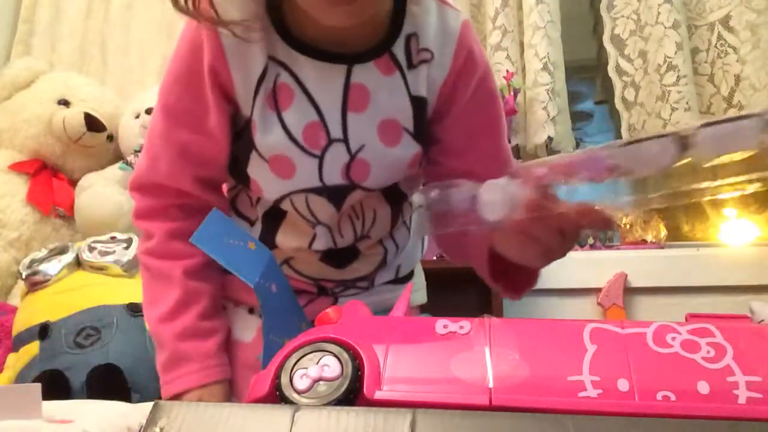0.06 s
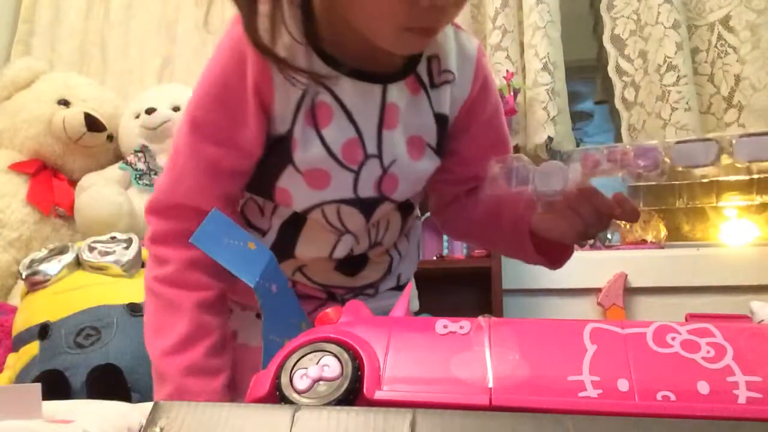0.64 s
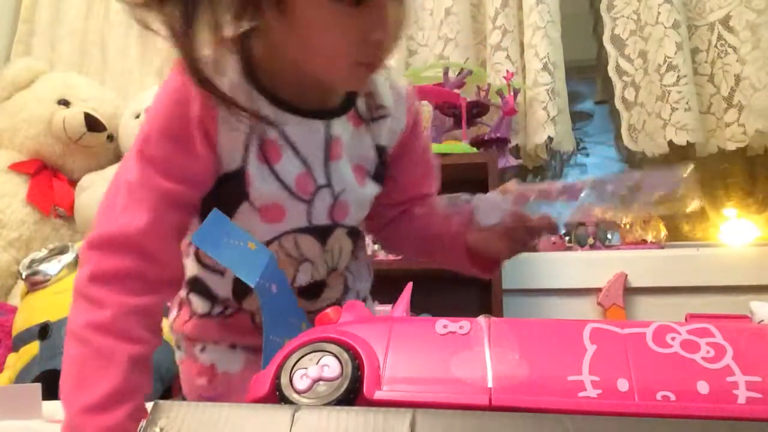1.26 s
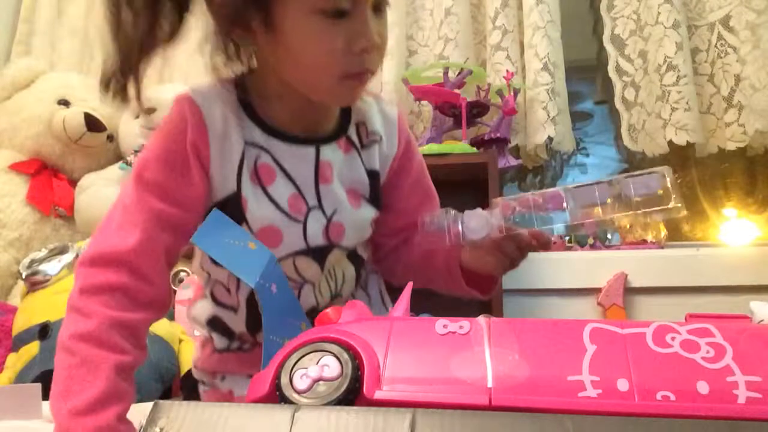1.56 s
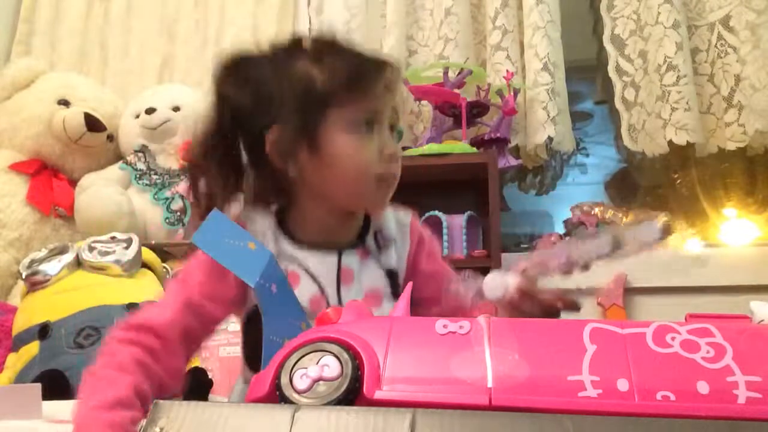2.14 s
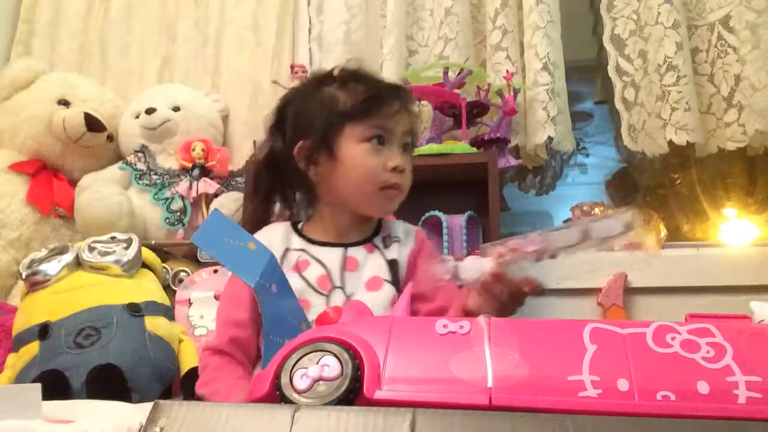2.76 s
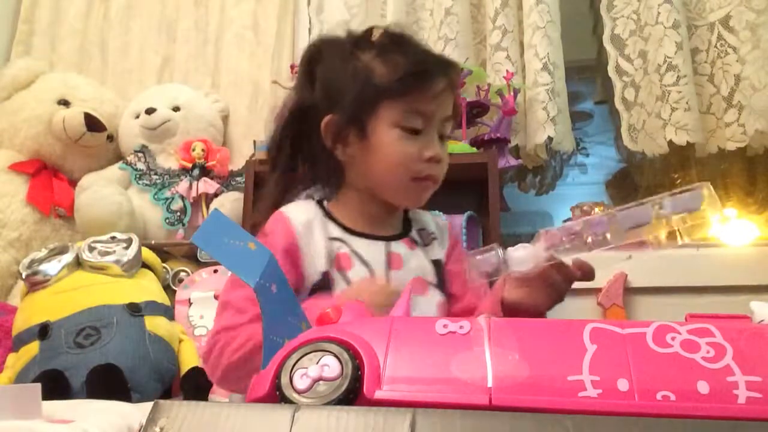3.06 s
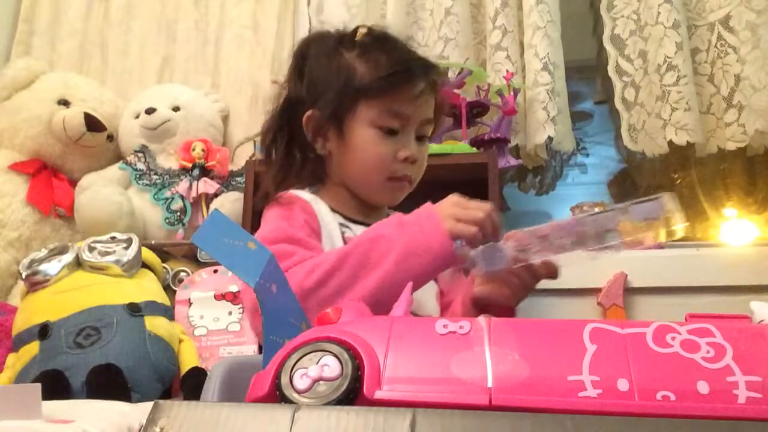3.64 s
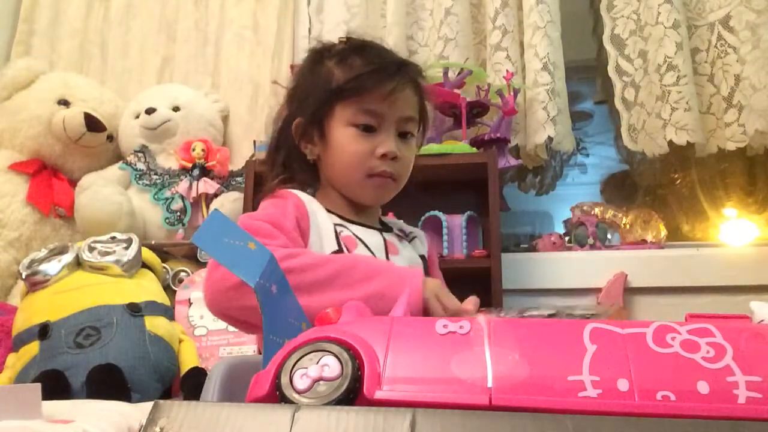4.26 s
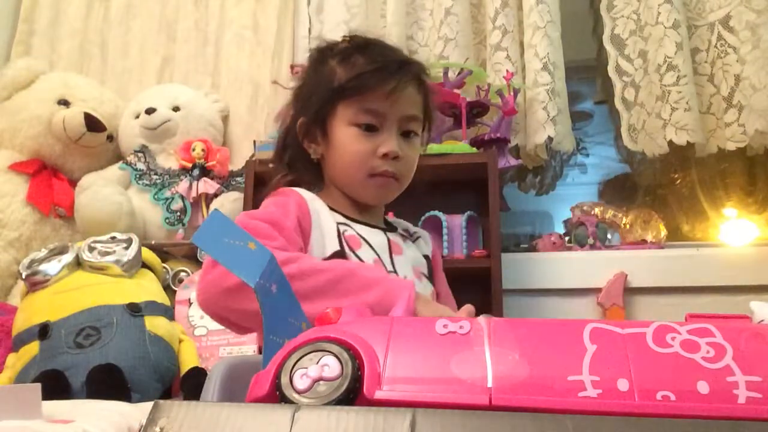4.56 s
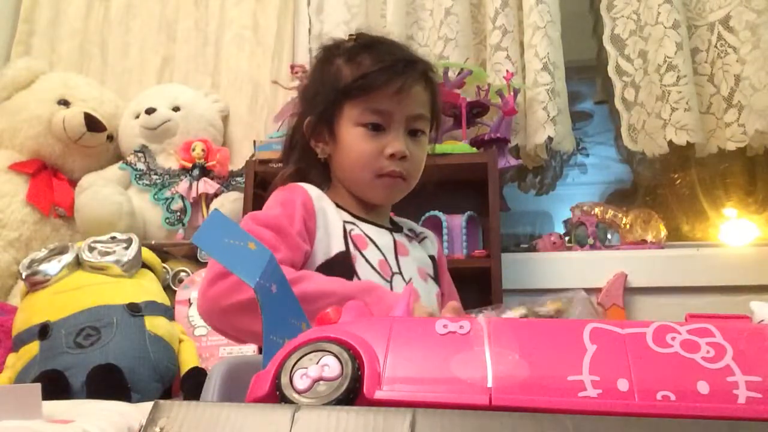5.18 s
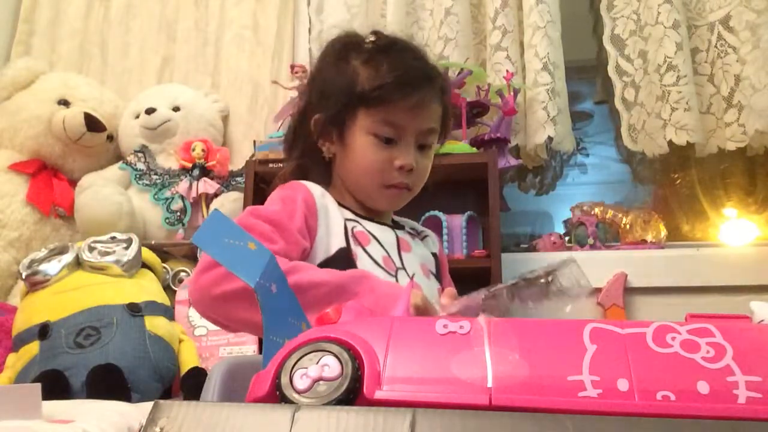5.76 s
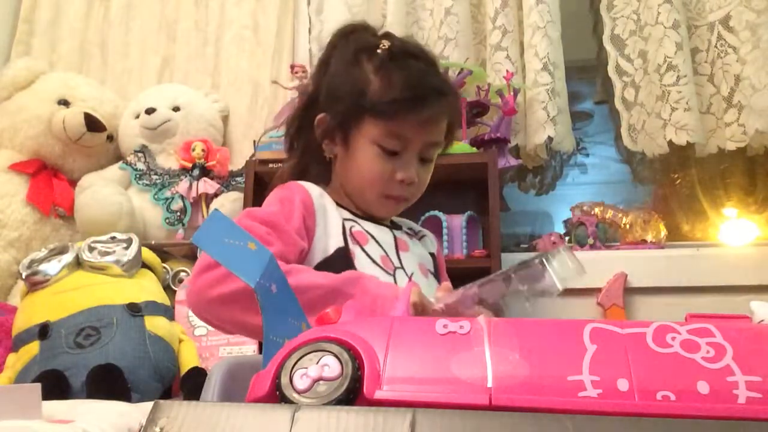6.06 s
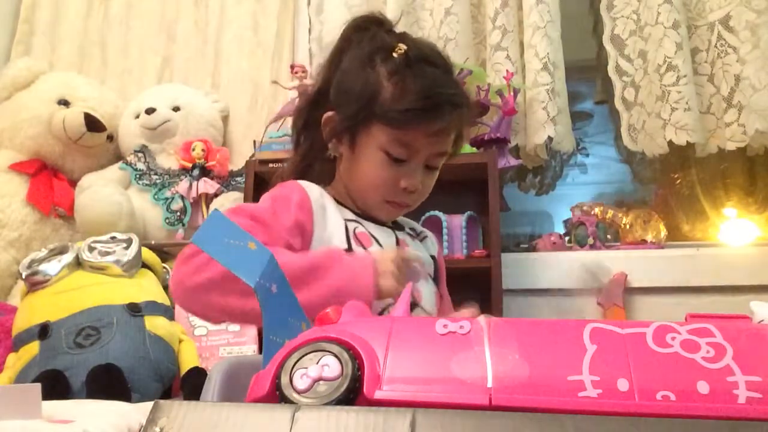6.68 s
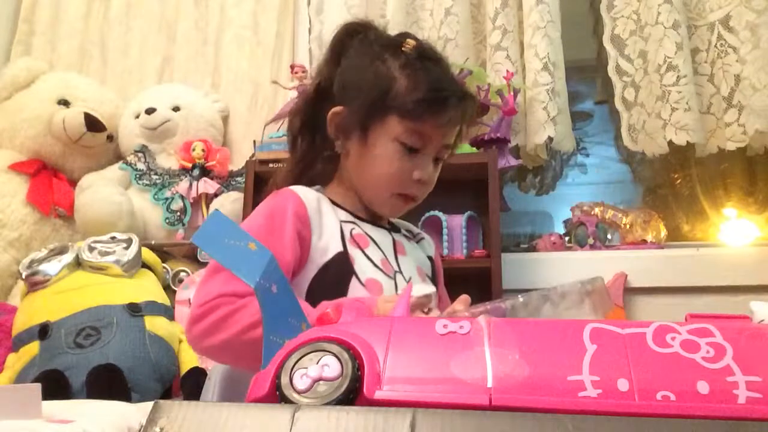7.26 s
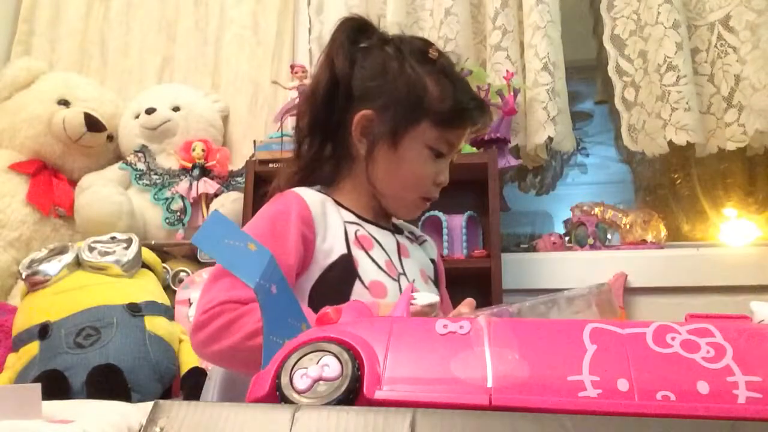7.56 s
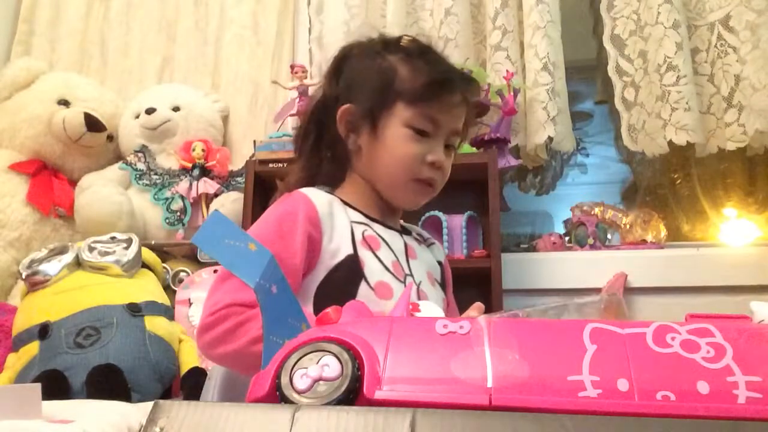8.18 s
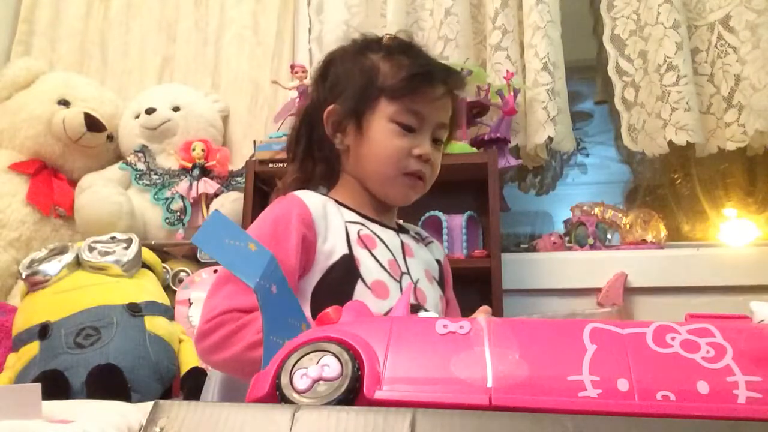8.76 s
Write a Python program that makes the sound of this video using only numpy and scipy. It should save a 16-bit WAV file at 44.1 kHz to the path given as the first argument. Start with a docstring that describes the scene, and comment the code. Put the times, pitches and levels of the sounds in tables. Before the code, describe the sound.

A soft swish of sleeves and packaging over a low hum gives way to faint ticks and hiss. Then a hand rubs and bumps a hollow toy car, making its shell boom, while a thin plastic tray snaps and crackles and small pieces tap. After sparser clicks, a busy patch of rustling, clattering and thumping follows near the end. The microphone is close, in a small furnished room with little echo.

```python
"""A small furnished room, one microphone close to a big hollow toy car.
Behind the car, hands work a clear plastic tray and small toy pieces: the thin tray snaps and crackles,
and the pieces ring briefly when tapped. Hands bump the car and drag things along it, so its shell booms.
Sleeves and packaging rustle between the contacts. Underneath lies a low hum, louder in the first second,
and a faint hiss that slowly fades after it."""
import sys
import numpy as np
from scipy import signal
from scipy.fft import rfft, irfft, next_fast_len
from scipy.io import wavfile
from scipy.ndimage import uniform_filter1d, map_coordinates

SR = 44100
rng = np.random.default_rng(int(sys.argv[2]) if len(sys.argv) > 2 else 0)


def wav_record(signal):
    """Record a signal, one row per channel, as 16-bit PCM in the file named by sys.argv[1]."""
    frames = np.transpose(np.atleast_2d(signal))
    bounded = np.clip(frames, -1, 1)
    # unit amplitude maps onto the largest positive 16-bit level
    quanta = np.round(bounded * 32767).astype(np.int16)
    wavfile.write(sys.argv[1], SR, quanta)


N = 388988


def amp(db):
    return 10 ** (np.asarray(db) / 20)


def unit(x):
    return x / np.sqrt(np.mean(x ** 2) + 1e-20)


def burst(x):
    """Scale a short sound to the energy of 20 ms at rms 1."""
    return x * np.sqrt(.02 * SR / (np.sum(x ** 2) + 1e-20))


def along(points, hz):
    """Read between (Hz, value) points on a log frequency axis."""
    freqs, values = np.transpose(points)
    return np.interp(np.log(hz + 1), np.log(freqs + 1), values)


def wobble(rate):
    """A smooth random curve, rate knots a second."""
    return map_coordinates(rng.standard_normal(int(N * rate / SR) + 4), [np.arange(N) * rate / SR])


def filtered(x, response):
    """Filter x by a gain given as a function of frequency."""
    size = next_fast_len(len(x) + 8192)
    return irfft(rfft(x, size) * response(np.fft.rfftfreq(size, 1 / SR)), size)[:len(x)]


def coloured(x, spectrum):
    """Shape x by (Hz, dB) points, at rms 1."""
    return unit(filtered(x, lambda hz: amp(along(spectrum, hz))))


def add(track, start, sound):
    """Mix a sound in at start seconds."""
    part = track[max(round(start * SR), 0):][:len(sound)]
    part += sound[:len(part)]


def swells(rows, attack_s, release_s, sag_db_per_s):
    """Gain of (start, length, dB) rows: each sets in, eases off and dies away."""
    gain = np.zeros(N)
    for start, length, db in rows:
        t = np.arange(int((length + 10 * release_s) * SR)) / SR
        onset = 1 - np.exp(-t / attack_s)
        release = np.exp(-np.maximum(t - length, 0) / release_s)
        add(gain, start, amp(db - sag_db_per_s * t) * onset * release)
    return gain


def slips(rate, spread_db, smooth):
    """Friction: tiny slips of uneven size, rate a second, over a smooth rub."""
    grains = (rng.random(N) < rate / SR) * rng.standard_normal(N)
    grains *= amp(spread_db * np.clip(rng.standard_normal(N), -2, 2))
    return unit(unit(grains) + smooth * rng.standard_normal(N))


def ringing(modes, t, detune, soft_db=0):
    """Damped (Hz, dB, t60) modes, struck with new strengths; a soft blow loses soft_db per octave."""
    hz, db, t60 = np.transpose(modes)[:, :, None]
    pitch, size, sign = rng.standard_normal((3, len(modes), 1))
    level = db + 2 * size - soft_db * np.log2(hz / hz[0]) - 60 * t / t60
    return np.sum(np.sign(sign) * amp(level) * np.sin(2 * np.pi * hz * (1 + detune * pitch) * t), 0)


def spot(force, hz, q):
    """The one mode that rings most where a contact lands."""
    return signal.lfilter(*signal.iirpeak(hz, q, fs=SR), force)


# The room's short tail. Each row: frequency in Hz, time to fall 60 dB in seconds.
ROOM_DECAY = [(150, 0.28), (600, 0.18), (1500, 0.17), (4000, 0.14), (12000, 0.13)]
# The near walls, heard from the microphone. Each row: echo delay in seconds, relative gain.
WALL_ECHOES = [(0.0042, 0.14), (0.01, 0.17), (0.0096, 0.23), (0.022, 0.11)]
def room(x, wet_db, echo_db):
    """Near walls echo, then a short tail dies; each call draws a new tail, as for a new position."""
    hz, t, noise = signal.stft(rng.standard_normal(SR // 4), SR, nperseg=256)
    decay = amp(-60 * t / along(ROOM_DECAY, hz)[:, None])
    tail = signal.istft(noise * decay * (1 - np.exp(-t / 0.0022)), SR, nperseg=256)[1]
    response = amp(wet_db) * tail / np.linalg.norm(tail)
    for delay, gain in WALL_ECHOES:
        add(response, delay * rng.uniform(.92, 1.08), np.array([gain * amp(echo_db)]))
    return signal.fftconvolve(x, response)


# Room tone at the microphone. Each row: frequency in Hz, relative density in dB.
HUM_SPECTRUM = [(21, -44), (35, 3), (87, -6), (112, 1.5), (191, -4), (280, -9), (326, -2.5), (370, -9.5),
                (680, -21.5), (970, -14.5), (1130, -17), (1570, -17.5), (2480, -25), (2960, -28.5),
                (15000, -44.5)]
def room_hum(level_db=-58, waver_db=0.74):
    """The low noise and faint hiss of the room, wavering slightly."""
    return amp(level_db + waver_db * wobble(15)) * coloured(rng.standard_normal(N), HUM_SPECTRUM)


# Rubbed plastic and cloth. Each row: frequency in Hz, relative density in dB.
SWISH_SPECTRUM = [(800, -7), (2300, 4.5), (4000, 8), (5500, 2), (8000, 0.5), (11000, -4), (15000, -10)]
# Sleeves and packaging brushing near the microphone. Each row: start, rise and fall in seconds,
# relative level in dB, tilt in dB per octave, upper edge in Hz.
SWISH_STROKES = [(.075, .04, .1, -59, .5, 18000), (.15, .09, .06, -53, 1, 18000),
                 (.24, .195, .02, -53.5, -1, 18000), (1.419, 0.037, 0.052, -67.5, -1, 18000),
                 (1.8, .05, .08, -69, -1, 9000), (2.3, .04, .08, -71, -1, 9000),
                 (2.18, 0.022, 0.021, -57, -4, 18000), (2.495, .04, .05, -66, 2, 7500),
                 (3.243, 0.028, 0.085, -34, -5, 18000), (3.535, .012, .06, -53, 0, 6000),
                 (3.62, .035, .04, -50, -1, 6000), (3.725, .04, .05, -48.5, -.5, 6000),
                 (4.115, .04, 0.04, -50, -1, 9000), (4.559, 0.041, 0.043, -58.5, 2, 18000),
                 (6.7, 0.013, 0.044, -44.5, 7, 18000), (7.111, 0.024, 0.072, -42.5, 1.5, 18000),
                 (7.42, .08, .02, -48, 6, 18000), (7.485, 0.045, 0.016, -39.5, 8.5, 20000),
                 (7.711, .09, 0.04, -48, 2.5, 18000)]
def swishes(level_db=-3.5, grit_db=2.0):
    """Each rub swells and fades with its speed, catching and slipping many times a second."""
    out, t = np.zeros(N), np.arange(SR // 2) / SR
    grit = amp(grit_db * (wobble(170) + wobble(44)))
    for start, rise, fall, db, tilt, edge_hz in SWISH_STROKES:
        def colour(hz):
            tilted = amp(along(SWISH_SPECTRUM, hz) + tilt * np.log2(hz + 1))
            return tilted / np.sqrt(1 + (hz / edge_hz) ** 8)

        speed = np.interp(t, [0, rise, rise + fall], [0, 1, 0])
        rub = unit(filtered(rng.standard_normal(len(t)), colour))
        add(out, start, amp(db + level_db) * np.sqrt(speed) * rub)
    return out * grit


# The long row at 1.147 s is a faint background hiss that slowly fades as the recorder settles;
# the others are moves of tray and packaging behind the car.
# Each row: start and length in seconds, relative levels of the scrape and rustle bands in dB.
SLIDES_AND_HISS = [(0.0, 0.086, -49, -56.5), (0.096, 0.35, -52.5, -57.5), (0.477, 0.64, -59, -64.5),
                   (1.147, 1.53, -62.5, -95), (3.062, 0.28, -52, -57), (3.216, 0.096, -45.5, -55.5),
                   (3.4, 0.51, -66, -72), (3.758, 0.25, -53, -60.5), (4.02, 0.22, -59.5, -60),
                   (4.196, 0.08, -49, -57), (4.3, 0.49, -64, -66.5), (4.789, 0.8, -56, -58),
                   (5.764, 0.2, -67, -68.5), (6.136, 0.43, -58, -68.5), (6.476, 0.24, -66, -63),
                   (6.686, 0.094, -52, -66), (6.8, 0.17, -46.5, -45), (7.005, 0.081, -54, -55),
                   (7.147, 0.1, -39, -47), (7.298, 0.28, -47, -53.5), (7.633, 0.2, -53, -52.5),
                   (7.862, 0.33, -69.5, -62.5), (8.464, 0.48, -62, -63.5)]
def band_gains():
    """The scrape and rustle bands swell together, for a move of the tray or for the fading hiss."""
    starts, lengths, *levels = np.transpose(SLIDES_AND_HISS)
    return [swells(zip(starts, lengths, db), attack_s=0.018, release_s=0.028, sag_db_per_s=2.5)
            for db in levels]


def packaging_ticks(level_db=2, spread_db=15, count=220, rustle_cap_db=-41):
    """Flexing packaging gives stray ticks that follow its rustle up to a cap; few are strong."""
    out, t = np.zeros(N), np.arange(1024) / SR
    rustle = np.minimum(band_gains()[1], amp(rustle_cap_db))
    for when, pitch, size in rng.random((count, 3)):
        force = rng.standard_normal(len(t)) * np.exp(-t / 0.0027)
        tick = burst(spot(force, 1400 * 4 ** pitch, q=4))
        gain = rustle[int(when * N)] * amp(level_db - spread_db * np.sqrt(size))
        add(out, when * N / SR, gain * tick)
    return out + room(out, wet_db=-6, echo_db=0)[:N]


def shifting_grip(x, depth_db):
    """A shifting grip brings out different resonances from moment to moment."""
    frames = signal.stft(x, nperseg=512)[2]
    patches = uniform_filter1d(rng.standard_normal(frames.shape), size=4, axis=0)
    patches = unit(uniform_filter1d(patches, size=7, axis=1))
    return unit(signal.istft(frames * amp(depth_db * patches), nperseg=512)[1][:N])


# The scrape and rustle bands, close up. Each row: frequency in Hz, relative density in dB.
SCRAPE_SPECTRUM = [(240, -9), (400, -8.5), (762, -10), (947, -3.5), (1190, -13.5), (1410, -8),
                   (2240, -14.5), (2500, -19), (3500, -30.5), (4550, -53), (7700, -120)]
RUSTLE_SPECTRUM = [(1180, -25.5), (2000, -17.5), (2350, -4.5), (2540, -14), (3200, -7), (5310, -9),
                   (9430, -16.5), (11200, -18), (14700, -20.5), (15500, -17.5)]
def sliding_and_hiss(scrape_db=-1, rustle_db=-3, catch_db=-54.5, crackle_db=-58):
    """The tray scrapes and packaging crackles; light touches and the background hiss stay smooth."""
    def friction(gain, rough_from_db, flutter_db, grains, spectrum):
        roughness = np.minimum(gain / amp(rough_from_db), 1) ** 2
        catching = amp(flutter_db) * coloured(grains, spectrum)
        smooth = coloured(rng.standard_normal(N), spectrum)
        return gain * (np.sqrt(roughness) * catching + np.sqrt(1 - roughness) * smooth)

    scrape_gain, rustle_gain = band_gains()
    pressure_db = 3.5 * wobble(35) + 0.1 * wobble(14)
    coarse = shifting_grip(slips(rate=500, spread_db=1.5, smooth=1.0), depth_db=3.5)
    fine = shifting_grip(slips(rate=990, spread_db=1, smooth=1.0), depth_db=2)
    scrape = friction(scrape_gain, catch_db, pressure_db / 2, coarse, SCRAPE_SPECTRUM)
    rustle = friction(rustle_gain, crackle_db, pressure_db, fine, RUSTLE_SPECTRUM)
    return amp(scrape_db) * scrape + amp(rustle_db) * rustle


# A hand sticking and slipping on the car. Each row: start and length in seconds, level in dB,
# slips per second.
HAND_GROANS = [(3.116, 0.053, -30.5, 172), (3.166, .058, -26.5, 180), (3.242, 0.0354, -27, 180)]
def hand_groans(octave_db=-11, jitter=0.064):
    """Nearly regular slips make the shell hum a low note that swells and fades with the push."""
    out = np.zeros(N)
    for start, length, db, hz in HAND_GROANS:
        t = np.arange(int(length * SR)) / SR
        drift = np.interp(t, np.linspace(0, length, 5), rng.standard_normal(5))
        phase = 2 * np.pi * (rng.random() + np.cumsum(hz * (1 + jitter * drift)) / SR)
        note = unit(np.sin(phase) + amp(octave_db) * np.sin(2 * phase))
        push = np.sqrt(np.abs(np.sin(np.pi * t / length)))
        add(out, start, amp(db) * push * note)
    return out


# The hollow car's low and upper modes. Each row: pitch in Hz, relative level in dB, t60 in seconds.
BASS_MODES = [(64.7, -10, 0.35), (89, -6, 0.099), (135.7, 3.5, 0.076), (154, 1, 0.057), (194.4, -2, 0.077),
              (245.8, -8, 0.15)]
SHELL_MODES = [(332, 3.5, 0.028), (397.6, -2, 0.047), (481.3, -9, 0.053), (604, -6.5, 0.022),
               (827, -24, 0.18), (960, -19.5, 0.043)]
# Dull bumps on the car, close to the microphone. Each row: start in seconds, relative level in dB,
# bass offset in dB, pitch of the struck panel in Hz.
CAR_BUMPS = [(.046, -43.5, -26, 457), (.078, -57, 17, 348), (1.135, -70, 13, 330), (1.165, -68, 15, 327),
             (1.399, -59.5, 4, 350), (1.444, -54.5, 5, 392), (1.472, -67, 18, 330), (1.503, -47, -11, 283),
             (1.801, -59, -3, 326), (1.858, -64, 5, 330), (1.931, -57.5, 6.5, 327), (2.002, -67, 13, 330),
             (2.289, -51.5, 12, 334), (2.32, -45.5, -11, 327), (2.981, -59.5, 15, 333),
             (3.032, -55.5, 15.5, 330), (3.198, -35.5, 2, 323), (3.244, -33.5, 7, 360),
             (3.6417, -24, 0, 328), (3.673, -31.5, -2.5, 321), (3.95, -36.5, -6, 426),
             (4.225, -37.5, -15, 580), (4.864, -36, -17, 339), (5.012, -54, 16.5, 320),
             (5.739, -47, -9.5, 373), (5.772, -30, 6, 336), (5.799, -35, 3.5, 295), (5.869, -42.5, -3, 430),
             (6.426, -50.5, 9, 430), (6.713, -47, 0.5, 478), (6.784, -42, 3, 494), (6.962, -39, -15, 493),
             (7.149, -29, -14, 402), (7.176, -21.5, -5, 390), (7.252, -32, -17, 380),
             (7.302, -37, -11, 307), (7.381, -33, -21, 370), (7.484, -43, 3, 371), (7.552, -24, -3.5, 330),
             (7.594, -29.5, -2.5, 485), (7.68, -30.5, -7, 336), (7.751, -37.5, -20, 434),
             (7.87, -40, -1.5, 406), (8.054, -60, 9, 402), (8.4, -48, -19, 350), (8.469, -44, -4, 478),
             (8.587, -46.5, -1.5, 357), (8.639, -39, -19, 449), (8.726, -39, -7, 337),
             (8.773, -42, -3, 338)]
def car_bumps(shell_db=-1, bass_db=-2, panel_db=0.5, panel_t60_s=0.072, attack_s=0.0024, softness=0.55):
    """Bumps boom in the hollow car, each at its panel's pitch; the bassier, the softer the contact."""
    out, t = np.zeros(N), np.arange(SR // 4) / SR
    onset = 1 - np.exp(-t / attack_s)
    for start, db, bass, hz in CAR_BUMPS:
        panel = burst(onset * ringing([(hz, 0, panel_t60_s)], t, detune=0.013))
        body = burst(onset * ringing(SHELL_MODES, t, detune=0.027, soft_db=softness * bass))
        shell = burst(body + amp(panel_db) * panel)
        boom = burst(onset * ringing(BASS_MODES, t, detune=0.083))
        bump = amp(db + shell_db) * shell + amp(db + bass + bass_db) * boom
        add(out, start, bump)
        add(out, start, room(bump, wet_db=-9, echo_db=0))
    return out


# A broad, low rumble. Each row: frequency in Hz, relative density in dB.
RUMBLE_SPECTRUM = [(18, -46), (30, -54), (49, 4), (98, 14), (150, -5), (179, -8), (226, 5), (289, 9.5),
                   (337, 7), (371, 12.5), (475, 3.5), (608, -47), (800, -33), (1040, -54), (1760, -120)]
# The rows at 0.3 s and 0.85 s are low background hum, louder at the start and fading over the first
# second; the others are drags along the car. Each row: start and length in seconds, relative level in dB.
DRAGS_AND_HUM = [(0.0, 0.007, -39), (.09, 0.035, -44.5), (.22, 0.066, -44), (.3, 0.49, -53),
                 (.85, 0.36, -68), (2.28, 0.03, -43.5), (4.56, 0.15, -53.5), (3.12, 0.052, -34),
                 (3.17, 0.16, -29.5), (5.745, 0.05, -35), (6.36, 0.16, -47), (6.79, 0.1, -38.5),
                 (7.1, 0.078, -32.5), (7.17, 0.16, -29.5), (7.39, 0.11, -30), (7.54, 0.062, -33),
                 (7.67, 0.11, -34), (7.87, 0.16, -49.5), (8.05, 0.16, -53.5)]
def drags_and_opening_hum(rumble_db=-7, boom_db=-6):
    """Drags judder with a rumble and the car's boom; the opening hum has the same low colour."""
    gain = swells(DRAGS_AND_HUM, attack_s=0.0018, release_s=0.029, sag_db_per_s=5.5)
    rumble = coloured(slips(rate=400, spread_db=2, smooth=.6), RUMBLE_SPECTRUM)
    modes = ringing(BASS_MODES + SHELL_MODES, np.arange(SR // 4) / SR, detune=0)
    boom = unit(signal.fftconvolve(rng.standard_normal(N), modes)[:N])
    return gain * (amp(rumble_db) * rumble + amp(boom_db) * boom)


# Small loose pieces behind the car. Each row: start in seconds, level in dB, pitch in Hz,
# relative overtone level in dB, t60 in seconds.
PIECE_TAPS = [(0.7128, -44.5, 1000, -4, 0.021), (2.5325, -59, 3330, -9, 0.0052),
              (5.1758, -56.5, 3150, -25, 0.016), (3.9208, -45, 2560, -12, 0.043),
              (3.9555, -32, 945, -11, 0.025), (5.1999, -56, 975, -19, 0.043), (6.6995, -43, 1806, -6, .06),
              (6.7778, -37.5, 4600, -30, 0.0079), (6.8128, -39, 1695, -14, .05),
              (7.2158, -32, 1110, -3, 0.014), (8.521, -48.5, 1945, -16, 0.026),
              (8.7278, -41, 1390, -15, 0.076), (8.728, -42, 2193, -24, .05)]
def piece_taps(overtone_ratio=1.93, attack_s=0.0024):
    """A tapped piece builds up a short, hollow note of two modes."""
    out, t = np.zeros(N), np.arange(SR // 10) / SR
    onset = 1 - np.exp(-t / attack_s)
    for start, db, hz, overtone_db, t60 in PIECE_TAPS:
        modes = [(hz, 0, t60), (hz * overtone_ratio, overtone_db, t60)]
        note = amp(db) * burst(onset * ringing(modes, t, detune=0.008))
        add(out, start, note)
        add(out, start, room(note, wet_db=-13, echo_db=-25))
    return out


def contact(t, length, grit_db=2.0, swell=0.091, strike=6.4):
    """A first strike, then gritty chatter; long contacts swell like a short scrape."""
    force = rng.standard_normal(len(t))
    force *= amp(grit_db * np.repeat(rng.standard_normal(len(t)), 24)[:len(t)])
    force *= 1 - np.exp(-t / (swell * length))
    force[0] = strike
    return force * np.exp(-t / length)


# The thin tray's resonances. Each row: centre in Hz, width in Hz, relative level in dB.
TRAY_MODES = [(685, 400, 4.5), (870, 140, -16.5), (1430, 610, -6.5), (2100, 160, -1.5), (2306, 170, 4.5),
              (3130, 970, -2), (3920, 230, 4.5), (4640, 980, -3.5), (5400, 1100, -19), (7600, 260, -2),
              (10820, 330, -9), (13700, 25000, -23)]
def tray_ring(force, damping, detune=0.024, scatter_db=8.0):
    """Grip and striking place change the resonances' pitch and strength; damping widens them."""
    centre, width, db = np.transpose(TRAY_MODES)[:, :, None]
    centre = centre * np.exp(detune * rng.standard_normal(centre.shape))
    gain = amp(db + scatter_db * rng.standard_normal(centre.shape))
    hz = np.fft.rfftfreq(len(force), 1 / SR)
    damped = width * np.where(width < centre, damping, 1)
    peaks = np.abs(hz * damped / (centre ** 2 - hz ** 2 + 1j * hz * damped))
    power = np.sum(gain ** 2 * width / damped * peaks ** 2, 0)
    # the causal response with this power spectrum
    cepstrum = irfft(np.log(power + 1e-6) / 2)
    cepstrum[1:len(force) // 2] *= 2
    cepstrum[len(force) // 2 + 1:] = 0
    return irfft(rfft(force) * np.exp(rfft(cepstrum)), len(force))


# Sharp contacts of tray and pieces, behind the car. Each row: start in seconds, relative level in dB,
# hollow and bright shares in dB, contact time in seconds, pitch of the struck spot in Hz.
TRAY_CLICKS = [(0.24, -45, -12, -8, 0.0088, 2220), (0.2505, -38, -7.5, -24, 0.014, 2300),
               (0.7122, -49.5, 1, -36, 0.0062, 740), (0.7935, -58.5, 2, -26, 0.014, 1450),
               (0.866, -64, -13, -12, .004, 4220), (0.9193, -65.5, -11, -6, 0.0023, 4200),
               (1.003, -74, 12, -20, 0.0036, 1050), (1.148, -77, -6, -12, .003, 3800),
               (1.18, -73, -9, -7, .002, 4200), (1.5032, -57.5, 7.5, -37, 0.0057, 900),
               (2.426, -71.5, -8, -8, .001, 6000), (2.4873, -65.5, -8, -7, 0.0012, 4660),
               (2.5334, -55.5, -18, -8, 0.00091, 4400), (2.726, -61.5, -1, -12, 0.0009, 3040),
               (3.049, -63, 2, -8.5, 0.0044, 970), (3.0905, -53, -17, -16, 0.0036, 1860),
               (3.165, -37.5, 1, -23.5, 0.0035, 2280), (3.2986, -37, -1, -14, 0.0074, 950),
               (3.428, -60.5, -4, -6, 0.0027, 4130), (3.466, -66, -7, -11, 0.0014, 4140),
               (3.503, -67, 2, -11, 0.0027, 4140), (3.644, -68, 18, -31, 0.012, 850),
               (3.731, -71, -7, 5, 0.0055, 4400), (3.798, -31, -16.5, -13, 0.0023, 4000),
               (3.8053, -47, 5.5, -18, 0.0037, 2300), (3.837, -47, -32, -7, 0.0021, 4940),
               (3.854, -42, -13, -1.5, 0.0034, 7300), (3.8867, -48, -12, 2, .002, 5500),
               (3.8928, -46.5, -12, -2, .0025, 5000), (3.9204, -40.5, -1, -1.5, 0.0018, 2190),
               (3.9251, -40, -3.5, -37, 0.0022, 2180), (3.9519, -37.5, -2, -4.5, 0.0024, 910),
               (3.9541, -33.5, -5.5, -28, 0.002, 960), (3.9586, -31.5, -3.5, -14, 0.00043, 1030),
               (3.997, -47, -26, -9, 0.0032, 4570), (4.067, -54, -1.5, -15, 0.0029, 1050),
               (4.143, -56, -7, -8, .007, 4800), (4.1645, -48.5, 2, -22, 0.0021, 2380),
               (4.178, -60, 0, -18, .002, 1500), (4.2184, -40.5, -6, -11, 0.0032, 4000),
               (4.2235, -48, -14, -9, 0.0033, 2170), (4.2287, -40, -1.5, -8, 0.0047, 2220),
               (4.239, -38, -0.5, -20, 0.016, 836), (4.454, -81, 23.5, -11, 0.0046, 607),
               (4.5088, -59.5, -2, -5.5, 0.0009, 2200), (4.759, -61, -2, -14, .0012, 2000),
               (4.819, -68, -14, -8, .001, 4400), (4.865, -24, -14.5, -9, 0.0012, 1334),
               (4.8755, -33, -5.5, -5, 0.0024, 1410), (4.8856, -52, -8, -4, .001, 4200),
               (5.0195, -43, -28, -38, 0.0021, 1730), (5.032, -47, -9, -45, 0.0016, 1550),
               (5.1762, -56, -4, -10, 0.0023, 3150), (5.1993, -65, 16, -22, 0.0021, 990),
               (5.2364, -60, -8, -21, 0.0032, 3100), (5.2855, -54.5, 1.5, -10, 0.0009, 4670),
               (5.3235, -63, -14, -16, .0012, 3120), (5.3883, -53, 0.5, -2, 0.0018, 5060),
               (5.406, -62, 0, -4, .001, 7000), (5.504, -64, 6, -3, 0.0012, 3780),
               (5.514, -59, 2, -7, 0.0011, 3700), (5.526, -63, 6, -7, 0.0011, 1500),
               (5.541, -62, 7.5, -3, 0.0033, 1520), (5.559, -65, 12.5, -2, 0.0011, 1490),
               (5.7406, -59.5, 15.5, -30.5, 0.0084, 940), (5.772, -54.5, 11.5, -35, 0.013, 900),
               (5.798, -46.5, -15, -9.5, 0.02, 2250), (5.8708, -50.5, 3.5, -12, 0.0075, 2920),
               (5.973, -65, 1, -19, 0.002, 1470), (5.982, -68, 3, -6, .0008, 4640),
               (6.062, -62, 1, -10, 0.0015, 2200), (6.1329, -51.5, 1.5, -14, 0.0033, 1450),
               (6.1652, -63, -17, -12, 0.00083, 3800), (6.18, -65, -8, -14, .002, 1800),
               (6.2447, -56, 2, -8.5, 0.0016, 1410), (6.336, -74, -5, -16, .001, 2300),
               (6.413, -62.5, 2, -13, 0.0013, 3500), (6.4763, -60, 6, -14, 0.0025, 2580),
               (6.3807, -57, 7.5, -10, 0.004, 1390), (6.503, -44.5, -2.5, -26, 0.013, 2330),
               (6.5944, -56, 3, -7.5, 0.0022, 1850), (6.614, -64, 5, -8, .001, 4200),
               (6.6737, -48, 2, -7.5, 0.0052, 1600), (6.6996, -39, -15, -20, 0.0036, 1700),
               (6.7107, -35.5, -3, -12.5, 0.0074, 2300), (6.7747, -46, -5, -10, 0.0036, 4500),
               (6.7776, -38.5, -20, -9.5, 0.0017, 6450), (6.799, -39.5, 3.5, -3, 0.0029, 1340),
               (6.8025, -49, -6, 5, .0015, 4500), (6.8121, -34.5, -1.5, -3.5, 0.0029, 1660),
               (6.8218, -38, -20, -16, 0.0036, 2770), (6.835, -40.5, -3, -25, 0.0018, 1740),
               (6.8508, -46, 2, -14, 0.001, 4800), (6.8625, -54, 9, -27, 0.0016, 2180),
               (6.8818, -43, 2.5, -31, 0.0059, 920), (6.9098, -42.5, -5, -7, 0.011, 4240),
               (6.9427, -45, -13, -13, 0.0099, 4530), (6.968, -40.5, 1, -19, 0.018, 2200),
               (7.0863, -41, 0, -14, 0.005, 776), (7.1148, -37, -2, -12, 0.013, 3430),
               (7.1257, -35.5, -18, -6, 0.011, 1540), (7.1602, -32, -2, -12, 0.0015, 1490),
               (7.167, -42.5, 7, -3, 0.0034, 4200), (7.1762, -33, 8, -37, 0.011, 814),
               (7.1936, -49, 17, -1, 0.0019, 910), (7.2151, -28.5, 0.5, -36, 0.00067, 1090),
               (7.2445, -51, -2, -19, 0.0017, 3450), (7.256, -43, 8, -35, 0.0076, 900),
               (7.3226, -54, -12, -14, 0.0045, 3000), (7.3796, -46.5, 5, -30, 0.0013, 896),
               (7.4419, -44.5, 2.5, -43, 0.0087, 920), (7.548, -51, 19, -3, 0.027, 850),
               (7.666, -39, -5.5, -9, 0.0018, 2240), (7.67, -37.5, -0.5, -8, 0.0025, 970),
               (7.6808, -45.5, 9.5, -7, 0.0049, 2100), (7.9, -53, -1, -24, 0.061, 1560),
               (8.015, -59.5, 2.5, -5.5, 0.026, 1500), (8.138, -72, 14, -21, 0.0037, 950),
               (8.187, -77, 17, -24, .004, 1080), (8.297, -70.5, 11.5, -3, 0.01, 1020),
               (8.402, -56, 4, -19, 0.003, 990), (8.415, -56.5, 2, -12, .002, 1890),
               (8.521, -49, -1, -19, 0.0022, 3140), (8.534, -56, -1, -23, .002, 3000),
               (8.587, -50.5, -6, -26, 0.0084, 1870), (8.6425, -48, 3, -19, 0.0061, 900),
               (8.652, -44, -6.5, -25, 0.009, 2330), (8.7263, -33.5, -0.5, -11, 0.0074, 1400),
               (8.774, -45, -6, -46, 0.0056, 1100)]
def tray_clicks(level_db=-1, force_db=-5, gentle_db=-50.5, hard_hz=8000):
    """Each contact cracks and rings the tray with its own share of hollow, middle and bright sound."""
    out, t = np.zeros(N), np.arange(3072) / SR
    bands = [signal.butter(3, edges_hz, "band", fs=SR, output="sos")
             for edges_hz in [(330, 1500), (1500, 5800), (6000, 17000)]]
    for start, db, hollow, bright, length, hz in TRAY_CLICKS:
        gains = amp(db + level_db + np.array([hollow, 0, bright]))
        # a dull contact is a soft one: it hardly reaches the upper modes
        softness = signal.butter(2, np.clip(hard_hz * amp(0.61 * (bright + 9.5)), 1100, 17000), fs=SR)
        # a firm grip damps the tray, so hard contacts are dry, broad cracks
        grip_damping = max(amp(0.04 * (db - gentle_db)), 1)
        # a gentle tap rings its own spot, a hard one the whole tray
        spot_db = -2.5 - 0.22 * (db - gentle_db)

        def radiate(damping, share_db):
            force = contact(t, length)
            ring = burst(tray_ring(force, damping)) + amp(force_db) * burst(force)
            ring += amp(share_db) * burst(spot(force, hz, q=9.8))
            ring = signal.lfilter(*softness, ring)
            return sum(gain * burst(signal.sosfilt(band, ring)) for gain, band in zip(gains, bands))

        add(out, start, radiate(grip_damping, spot_db))
        # the walls gather sound from all sides of the tray, which evens out its resonances
        all_sides = radiate(4.7 * grip_damping, spot_db - 7)
        add(out, start, room(all_sides, wet_db=-6, echo_db=-5))
    return out


def scene():
    """All the handling happens close to one microphone, with the room behind it."""
    contacts = tray_clicks() + piece_taps()
    lows = car_bumps() + drags_and_opening_hum() + hand_groans()
    rustle_and_hiss = sliding_and_hiss() + packaging_ticks() + swishes()
    return (contacts + lows + rustle_and_hiss + room_hum())[None]


def record(dry, low_hz=42, top_hz=15500):
    """The microphone sheds the deepest bass; the treble ends steeply at the band limit."""
    x = signal.sosfilt(signal.butter(2, low_hz, "high", fs=SR, output="sos"), dry[0])
    return filtered(x, lambda hz: 1 / (1 + (hz / top_hz) ** 160))[None]


dry = scene()
out = record(dry)
wav_record(out)
```